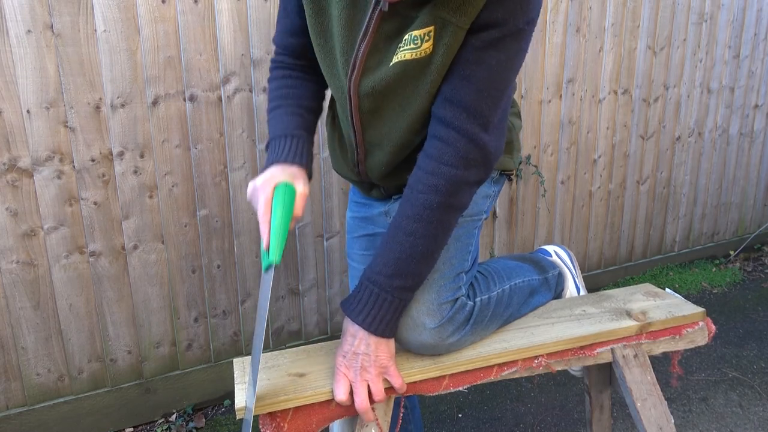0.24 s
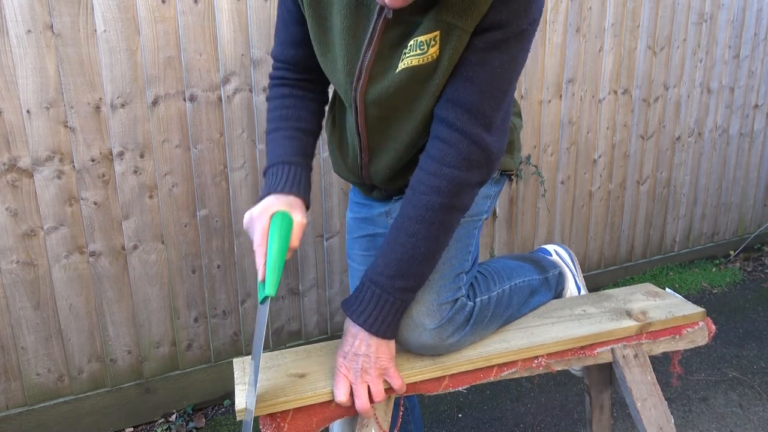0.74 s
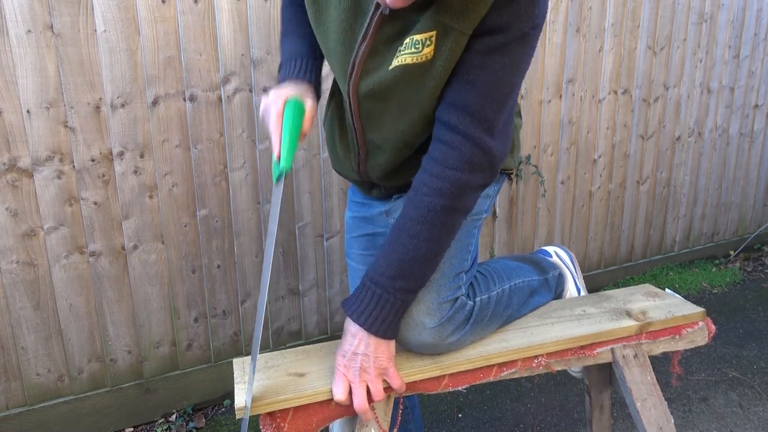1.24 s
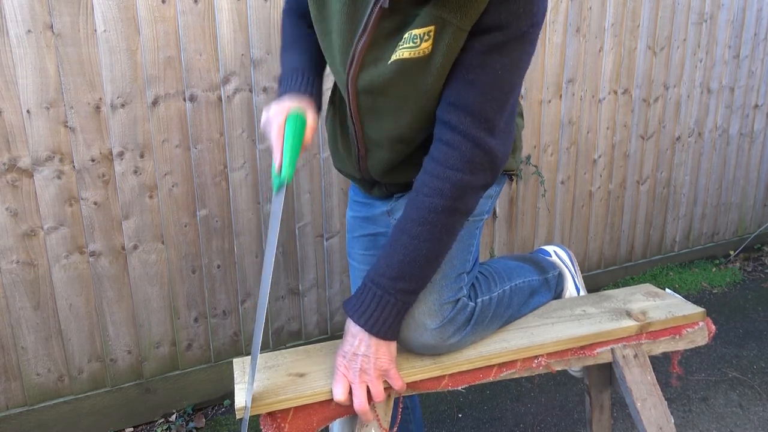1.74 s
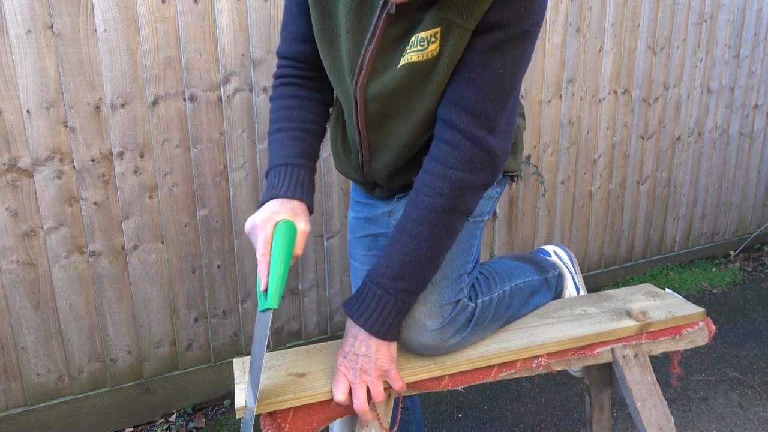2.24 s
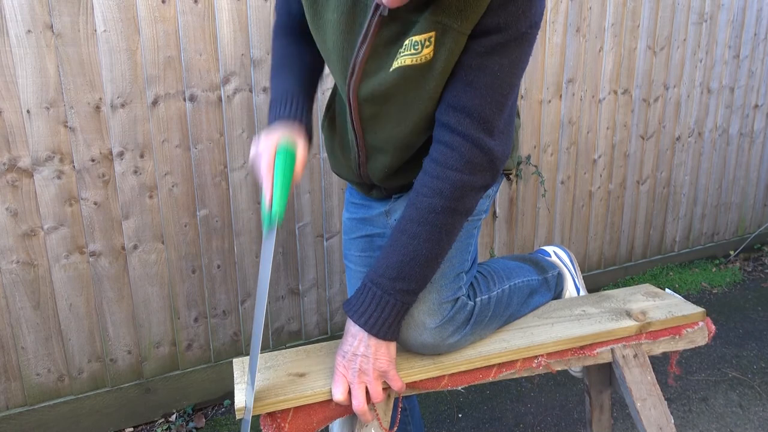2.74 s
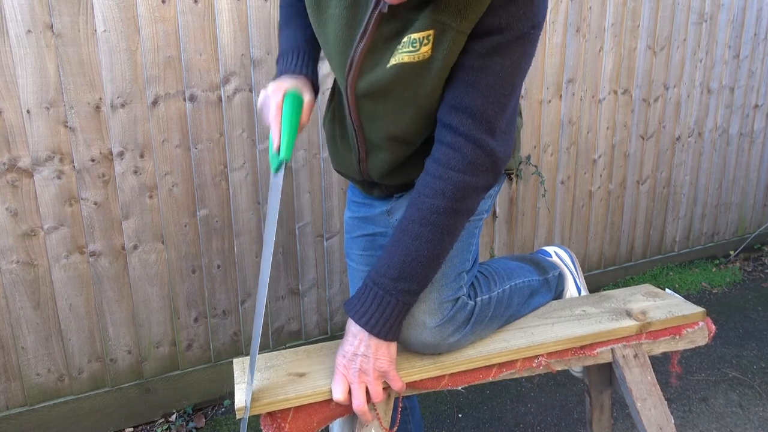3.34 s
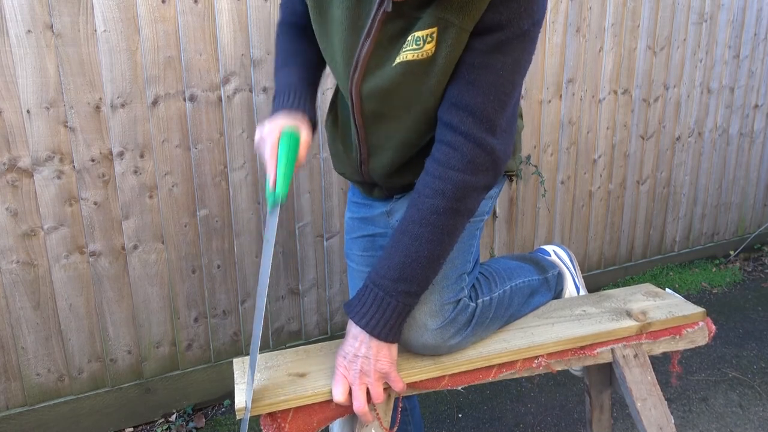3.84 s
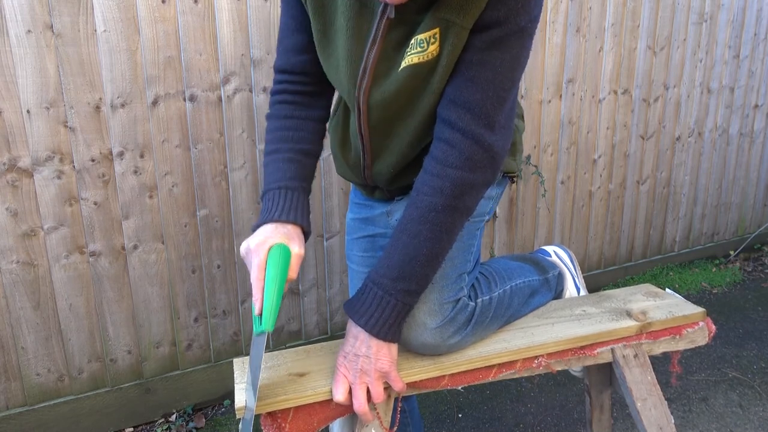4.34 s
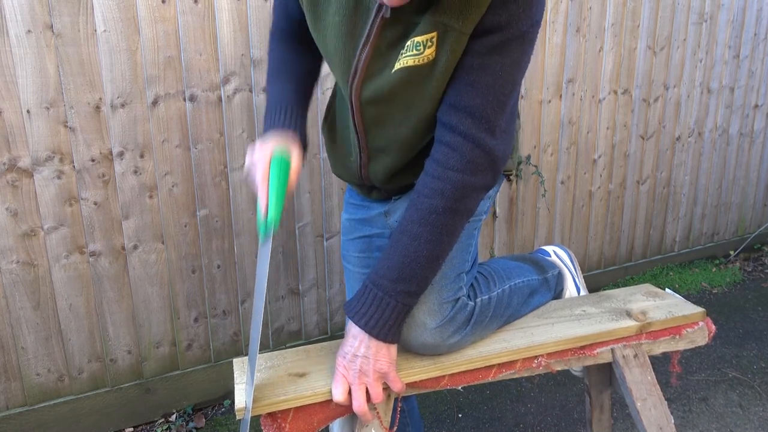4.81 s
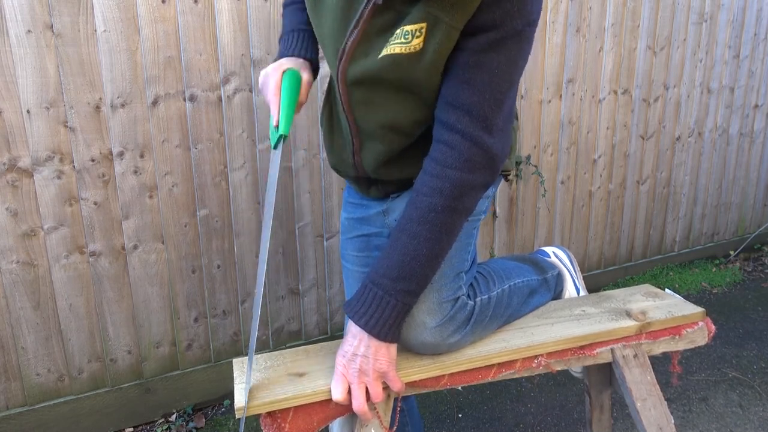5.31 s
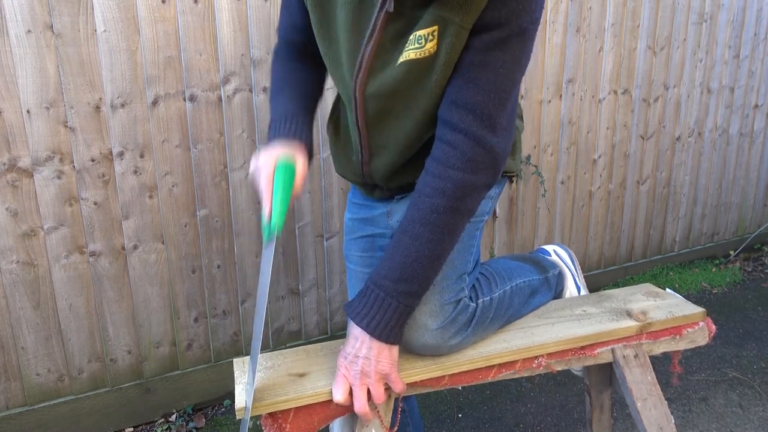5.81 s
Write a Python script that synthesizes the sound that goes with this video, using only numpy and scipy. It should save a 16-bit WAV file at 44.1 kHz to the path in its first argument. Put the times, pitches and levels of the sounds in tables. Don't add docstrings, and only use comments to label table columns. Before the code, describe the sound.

Close, mono sawing outdoors, starting at 0 s in the middle of a hoarse push already at full speed. Further pushes peak near 0.7, 1.4, 2.1, 2.8, 3.5, 4.2, 4.9 and 5.5 s, with a last one beginning around 6.1 s. Each is a dense, fibrous rasp with a tooth buzz that rises then falls; later pushes are faster, higher and brighter. Between them come quieter, rougher pulls, dragging and juddering, with small snags, notably a hard catch near 1 s. From 2.3 to 2.6 s the binding blade gives a cluster of loud, piercing, stuttering squeals; a shorter, weaker squeak comes at about 4.4 s. Damp wood resonates with a low boom that gradually thins. The sound falls quiet quickly between strokes, leaving faint fence echoes, soft outdoor air and a low breeze.

```python
import sys
import numpy as np
from scipy import signal
from scipy.fft import rfft, irfft, next_fast_len
from scipy.io import wavfile
from scipy.ndimage import uniform_filter1d, minimum_filter1d

SR = 44100
rng = np.random.default_rng(int(sys.argv[2]) if len(sys.argv) > 2 else 0)


def elevation(decibels):
    levels = np.asarray(decibels, float)
    return 10 ** (levels / 20)


def wav_record(signal):
    frames = np.transpose(np.atleast_2d(signal))
    bounded = np.clip(frames, -1, 1)
    quanta = np.round(bounded * 32767).astype(np.int16)
    wavfile.write(sys.argv[1], SR, quanta)


N = 267731
T = np.arange(N) / SR


def evened(x):
    return x / np.sqrt(np.mean(abs(x) ** 2) + 1e-20)


def read(points, hz):
    f, value = np.transpose(points)
    return np.interp(np.log(hz + 1), np.log(f + 1), value)


def smooth(x, width):
    r = np.exp(-np.pi * np.clip(width, 1, SR / 3) / SR)
    return signal.lfilter([(1 - r) ** 2], [1, -2 * r, r * r], x)


def causal(gain_db):
    log_gain = np.log(elevation(np.maximum(gain_db, -100)))
    full = np.concatenate([log_gain, log_gain[-2:0:-1]])
    return np.fft.ifft(np.exp(full - 1j * signal.hilbert(full).imag)).real[:4096]


def wander(width):
    return evened(smooth(rng.standard_normal(N), width))


# rise past 200 teeth a second t/s, full speed t/s, fall past 200 t/s, top tooth rate f/Hz
PUSHES = [
    (-.1, .04, .15, 340),
    (.589, .67, .755, 386),
    (1.252, 1.376, 1.454, 428),
    (1.966, 2.08, 2.164, 402),
    (2.694, 2.83, 2.89, 543),
    (3.365, 3.5, 3.575, 530),
    (4.066, 4.195, 4.265, 535),
    (4.74, 4.875, 4.945, 564),
    (5.39, 5.52, 5.589, 600),
    (6.07, 6.2, 6.28, 560),
]
BITES_DB = [-18.5, -16, -17.5, -15.5, -18.5, -16.5, -20.5, -20, -19, -34]
PUSHES_DB = [-17.5, -13, -14.5, -14.5, -14.5, -13.5, -14, -14, -14, -13]


def teeth():
    speed_up_power, brake_power = 1.25, 0.89
    rate, bite, cut = np.zeros((3, N))
    for (rise, peak, fall, top_hz), bite_db, cut_db in zip(PUSHES, BITES_DB, PUSHES_DB):
        speeding_up = T < peak
        away = np.where(speeding_up, (peak - T) / (peak - rise), (T - peak) / (fall - peak))
        arch = top_hz * np.cos(np.minimum(np.arccos(200 / top_hz) * away, np.pi / 2))
        rate += arch
        bite += elevation(bite_db) * np.clip(arch / 130, 0, 1)
        cut += elevation(cut_db) * abs(arch / top_hz) ** np.where(speeding_up, speed_up_power, brake_power)
    uneven_rate = rate * (1 + (.015 + .004 * T) * wander(120))
    return 2 * np.pi * np.cumsum(uneven_rate) / SR, rate, bite, cut


# start t/s, fastest t/s, end t/s, cutting level/dB, weight on
# the plank level/dB
PULLS = [(0.241, 0.36, 0.5, -20.5, 3.5), (0.837, 1.06, 1.122, -21, 2.5), (1.552, 1.76, 1.86, -21, 0),
         (2.317, 2.344, 2.43, -25.5, 1.5), (2.43, 2.443, 2.48, -19, -9), (2.512, 2.55, 2.586, -20.5, -3.5),
         (2.98, 3.048, 3.25, -25, 3), (3.1, 3.21, 3.27, -24.5, -0.5), (3.665, 3.735, 4.01, -29.5, 4.5),
         (3.813, 3.835, 4.01, -27, -3.5), (4.397, 4.478, 4.53, -27, 4.5), (4.493, 4.576, 4.684, -24.5, 0),
         (5.026, 5.096, 5.5, -29.5, 3), (5.172, 5.214, 5.25, -24.5, 2), (5.691, 5.757, 5.92, -28.5, 3),
         (5.813, 5.928, 6.0, -26.5, 0)]


def pulls():
    slow_boom_db, fast_boom_db = 2, -7.5
    boom, cut = np.zeros((2, N))
    for start, peak, end, db, weight_db in PULLS:
        arch = np.sin(np.pi / 2 * np.interp(T, [start, peak, end], [0, 1, 0]))
        level = elevation(db) * arch ** 0.9
        boom += level * (slow_boom_db + weight_db + fast_boom_db * arch)
        cut += level
    return boom / (cut + 1e-9), cut


BOOM_DB_PER_S = -0.77
THUD_DB = -3
RASP_DB = (-0.5, -4, -0.2)
HISS_DB = (-11, -6.5, -11.5)
FIZZ_DB = (-13, -11.5, -14)


def shares(rate, pull_boom, push, pull):
    rest_db = -62
    fall = 250 * T
    driven_db = 20 * np.log10(push + pull + elevation(rest_db))
    cut_db = np.maximum.accumulate(driven_db + fall) - fall
    dying_away = elevation(cut_db) - push - pull
    weight = np.array([push, pull, dying_away]) / elevation(cut_db)
    past_hz = np.maximum(rate - 200, 0)
    push_boom = 1.5 - 0.0212 * past_hz
    boom = (weight * [push_boom, pull_boom, 1.7 + 0 * T]).sum(0) + BOOM_DB_PER_S * (T - 2)
    thud = boom + THUD_DB - 0.0077 * past_hz - T
    braking = weight[0] * (np.gradient(rate) < 0)
    braking *= np.clip(1 - rate / 520, 0, 1) * np.minimum(0.1 + T / 5, 1)
    hiss = np.dot(HISS_DB, weight) + 5.5 * braking + 0.33 * T
    fizz = np.dot(FIZZ_DB, weight) + 11.5 * braking + 0.5 * T
    rasp = np.dot(RASP_DB, weight) + 0.36 * (T - 3)
    return [uniform_filter1d(c, size=500) for c in (cut_db, thud, boom, rasp, hiss, fizz)]


# multiple of the tooth rate, level/dB
BITE_HARMONICS = [
    (1, 0),
    (2, -9),
    (3, -2),
    (4, -13),
]


def tooth_bites(phase, bite):
    rhythm = sum(elevation(db) * np.cos(k * phase) for k, db in BITE_HARMONICS)
    return bite * elevation(3.2 * wander(55)) * rhythm


def tearing_fibres(phase, bite):
    pushing = np.minimum(bite / elevation(-20), 1)
    chip_levels = elevation(4.63 * np.minimum(rng.exponential(1, N), 5))
    chips = chip_levels * (rng.random(N) < 2500 / SR) * rng.choice([-1, 1], N)
    tearing = 0.84 * rng.standard_normal(N) + 0.54 * evened(chips)
    tearing *= 1 + 0.16 * pushing * np.cos(phase)
    judder_db = (1.7 - .9 * pushing) * wander(75) + 1.2 * wander(300)
    return evened(tearing * elevation(judder_db))


# t/s, peak level/dB
SNAGS = [(0.249, -15), (0.279, -14), (0.919, -14), (0.946, -8.5), (0.984, -4.5), (1.085, -27), (1.12, -9),
         (1.144, -12), (1.705, -16), (1.911, -20.5), (2.67, -18), (3.008, -21), (3.041, -14), (3.351, -17),
         (3.829, -13), (4.524, -15), (4.556, -12), (5.199, -11), (5.714, -37)]


def snags():
    at, snag_db = np.transpose(SNAGS)
    kicks = np.bincount((at * SR).astype(int), elevation(snag_db - 11), N)
    t60 = 0.032
    decayed = signal.lfilter([1], [1, -elevation(-60 / SR / t60)], kicks)
    return uniform_filter1d(decayed, size=100, origin=49)


# f/Hz, level/dB per Hz
BODY = [(53, -56), (90, -20.5), (192, -5), (239, -7), (316, -9.5), (521, -3.5), (821, -4.5), (1190, -5),
        (1570, -6), (2760, -10.5), (4860, -6), (6300, -10), (12600, -13), (16000, -14)]
# f/Hz, width f/Hz, level/dB over the broad colour
RINGS = [(210, 40, 10), (470, 60, 5), (535, 70, 7), (650, 45, 3), (900, 40, 2), (1115, 50, 3),
         (1350, 80, 6), (1620, 90, 7), (1770, 50, 4), (2040, 100, 4), (2220, 50, 4), (2460, 60, 4),
         (3050, 110, 3), (3550, 140, 4), (4190, 160, 2), (4780, 220, 4), (5250, 260, 4), (5700, 250, 3),
         (6680, 180, 2), (7050, 180, 2), (9300, 270, 1), (10100, 400, 2), (12800, 400, 2)]


def resonances():
    hz = np.fft.rfftfreq(8192, 1 / SR)
    colour = read(BODY, hz)
    for f, width, db in RINGS:
        depth = 1.45 if f > 800 else 1.1
        colour += depth * db / (1 + (2 * (hz - f) / max(width, 30 + f / 60)) ** 2)
    return causal(colour)


SPLIT_HZ = [330, 700, 1900, 3000, 7000]


def saw():
    phase, rate, bite, push = teeth()
    pull_boom, pull = pulls()
    cut, thud, boom, rasp, hiss, fizz = shares(rate, pull_boom, push, pull)
    bites = tooth_bites(phase, bite)
    drive = tearing_fibres(phase, bite)
    level = elevation(cut) + snags()
    size = next_fast_len(N + 8192)
    body = rfft(resonances(), size)
    hz = np.fft.rfftfreq(size, 1 / SR)
    above = [1 / (1 + (edge / (hz + 1)) ** 5) for edge in SPLIT_HZ]
    parts = -np.diff([1 + 0 * hz, *above, 0 * hz], axis=0)
    bite_boom = 1.5 - 0.0019 * np.maximum(rate - 200, 0) + BOOM_DB_PER_S * (T - 2)
    upper = (rasp - 3, -3, hiss, fizz)
    tearing_shares = (thud, boom, *upper)
    bite_shares = (bite_boom + THUD_DB, bite_boom, *upper)
    out = np.zeros(N)
    for part, tearing_db, bite_db in zip(parts, tearing_shares, bite_shares):
        force = (drive * elevation(tearing_db) + bites * elevation(bite_db)) * level
        out += irfft(rfft(force, size) * evened(body * part), size)[:N]
    return out


# t/s, f/Hz, level/dB, ring duration t/s, ring level/dB
LOCKS = [(.875, 9500, -24, .005, -31), (2.295, 4035, -9, .001, -28), (2.296, 8085, -15, .05, -27),
         (2.298, 12200, -21, .05, -24), (2.312, 10250, -22, .02, -25), (2.374, 12500, 5, .003, -24),
         (2.396, 9775, 4, .065, -16), (2.41, 10240, -9, .05, -18), (2.471, 14090, 7, .04, -25),
         (2.473, 13200, -10, .005, -22), (2.476, 10450, -8, .065, -17), (2.486, 11000, -10, .055, -18),
         (2.492, 11550, -1, .015, -23), (2.525, 14085, 3, .06, -23), (2.556, 10200, -12, .03, -17),
         (2.556, 11000, -11, .03, -17), (4.356, 4950, -16, .001, -30), (4.362, 6650, -26, .03, -31),
         (4.362, 5600, -21, .002, -27), (4.366, 9295, -7, .035, -21), (4.376, 12420, -8, .008, -12),
         (2.324, 4035, -16, .022, -21), (4.388, 15350, -22, .02, -30), (4.4, 12450, -26, .028, -28)]
# t/s, duration t/s, f/Hz, width f/Hz, level/dB
SCRAPES = [(.875, 0.0063, 5500, 2000, -21), (.876, 0.01, 11500, 7000, -24), (2.293, 0.0041, 6520, 8760, -7),
           (2.294, .01, 5300, 500, -20), (2.314, .02, 13250, 500, -21), (2.377, 0.0096, 13900, 900, -2.5),
           (2.384, .009, 10200, 500, -3), (2.406, .03, 13700, 700, -26), (2.471, 0.012, 13600, 3000, -4),
           (2.523, .005, 12800, 2000, -2), (2.54, .005, 14000, 700, -13), (2.552, 0.0043, 10900, 1780, 3.5),
           (3.678, 0.068, 9200, 7000, -28.5), (4.355, 0.037, 11050, 8800, -13.5),
           (4.356, 0.015, 4590, 1500, -12.5), (4.363, 0.01, 3700, 300, -24),
           (4.403, 0.072, 3520, 5000, -29), (5.725, 0.032, 11000, 4000, -33.5)]


def slips():
    rows = [(*row, .015) for row in SCRAPES]
    for s, hz, db, ring_s, ring_db in LOCKS:
        length = 85 / hz
        ring_width = 170 * (hz / 1e4) ** 2
        rows.append((s, length, hz, 35, db, .015))
        rows.append((s + length, ring_s, hz, ring_width, ring_db, .1))
    return rows


def squeals():
    out = np.zeros(N)
    t = np.arange(7000) / SR
    for s, length, hz, width, db, t60 in slips():
        a, b = rng.standard_normal((2, 9000))
        z = evened(smooth(a + 1j * b, width)[2000:])
        z /= abs(z) ** np.clip(.75 - width / 900, 0, 1) + 1e-9
        onset = np.minimum(t / .0015, 1)
        shape = onset * elevation(db - 60 * np.maximum(t - length, 0) / t60)
        sharp = .02 * .003 * (1 - np.exp(-t / .003))
        start = round(s * SR)
        out[start:start + len(t)] += shape * (z * np.exp(2j * np.pi * hz * (t + sharp))).real
    return out


# delay t/s, level/dB
FENCE = [
    (.004, -13),
    (.0075, -15),
    (.013, -17),
    (.021, -19),
]


def surroundings(x):
    t = np.arange(SR // 3) / SR
    tail = rng.choice([-1., 1.], len(t)) * (rng.random(len(t)) < .05)
    tail *= elevation(-60 * t / .25) * (t > .02)
    taps = elevation(-15) * tail / np.linalg.norm(tail)
    for s, db in FENCE:
        taps[round(s * SR)] += elevation(db - 11.0)
    taps = smooth(taps, 12000)
    taps[0] = 1
    return signal.oaconvolve(x, taps / np.linalg.norm(taps))[:N]


# f/Hz, level/dB per Hz
GARDEN = [(12, -48), (20, -47), (93, -15.5), (187, 2), (337, -6), (485, -14.5), (949, -6.5), (5380, -23),
          (13200, -53), (16000, -70)]
# f/Hz, level/dB per Hz
BREEZE_COLOUR = [(12, -29), (20, 7.5), (48, -9), (70, 1), (97, -6.5), (120, -7.5), (160, 10), (260, -120)]


def coloured_noise(colour):
    hz = np.fft.rfftfreq(N, 1 / SR)
    return evened(irfft(rfft(rng.standard_normal(N)) * elevation(read(colour, hz)), N))


def garden():
    air_db = -47.5 + 11.0 + 2.0 * wander(0.54)
    push_dip = sum(np.exp(-((T - peak) / 0.065) ** 2) for _, peak, _, _ in PUSHES)
    breeze_db = -39 - 1.13 * T - 22 * push_dip + 5 * wander(10)
    return elevation(air_db) * coloured_noise(GARDEN) + elevation(breeze_db) * coloured_noise(BREEZE_COLOUR)


def scene():
    return np.tile(surroundings(saw() + squeals()) + garden(), (2, 1))


def low_pass(x):
    return signal.sosfilt(signal.butter(12, 16470, fs=SR, output="sos"), x)


def record(dry):
    over_db = np.maximum(20 * np.log10(abs(dry[0]) + 1e-9) + .3, 0)
    fall = 200 * T
    held_db = np.maximum.accumulate(over_db + fall) - fall
    ahead_db = uniform_filter1d(-minimum_filter1d(-held_db, size=89), size=45)
    edge = signal.firwin(255, 15650, window=("kaiser", 7), fs=SR)
    mix = signal.oaconvolve(dry / elevation(ahead_db), edge[None], "same")
    return low_pass(mix)


dry = scene()
out = record(dry)
wav_record(out)
```